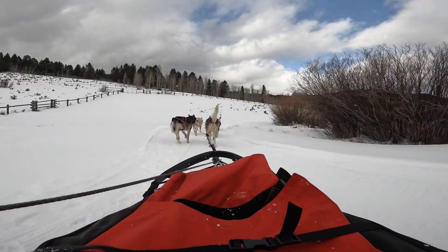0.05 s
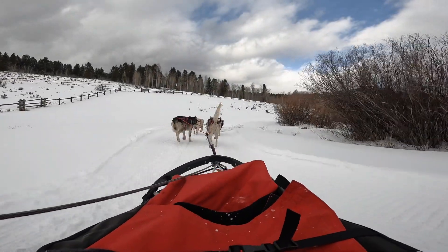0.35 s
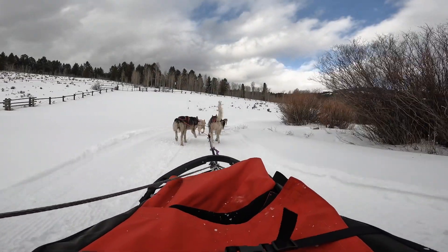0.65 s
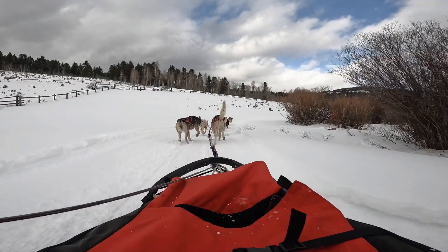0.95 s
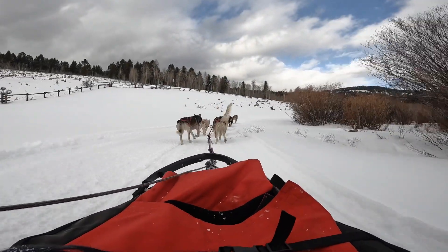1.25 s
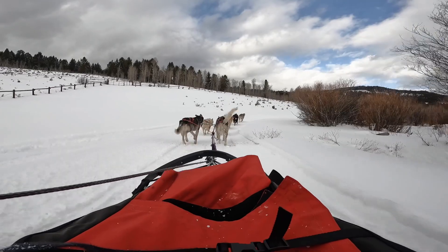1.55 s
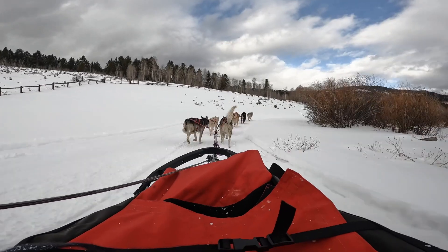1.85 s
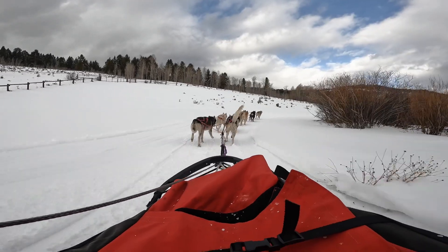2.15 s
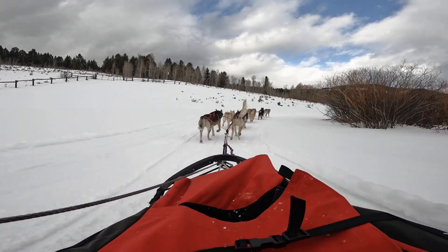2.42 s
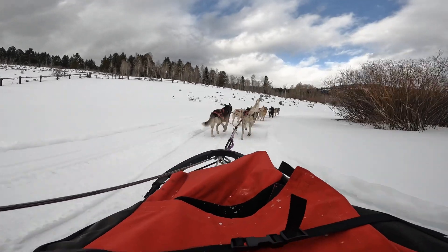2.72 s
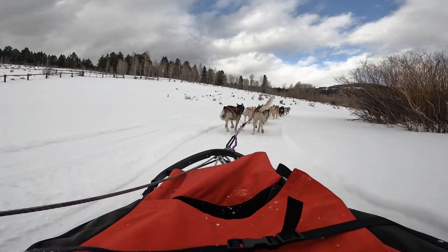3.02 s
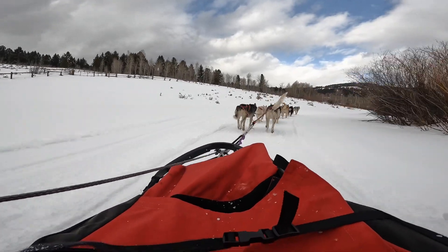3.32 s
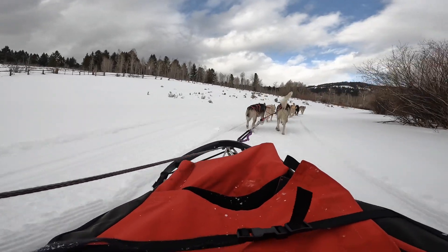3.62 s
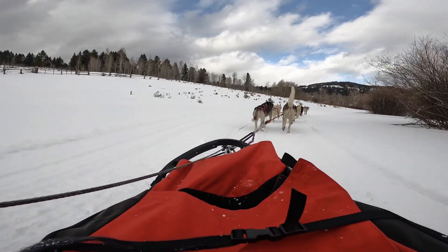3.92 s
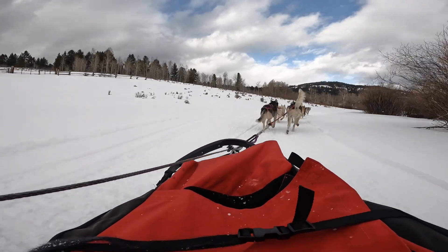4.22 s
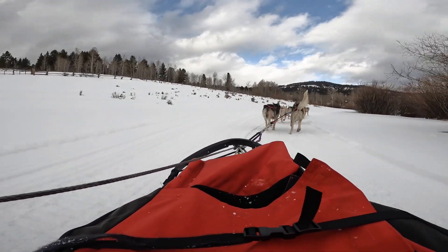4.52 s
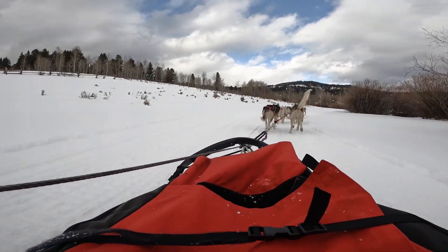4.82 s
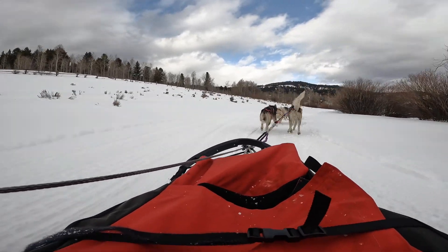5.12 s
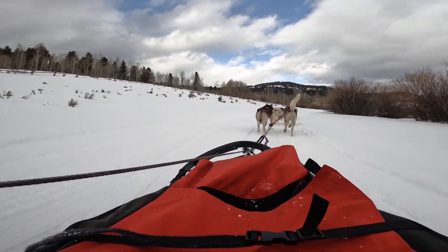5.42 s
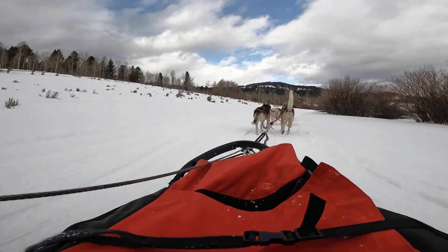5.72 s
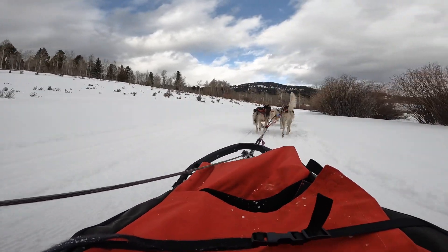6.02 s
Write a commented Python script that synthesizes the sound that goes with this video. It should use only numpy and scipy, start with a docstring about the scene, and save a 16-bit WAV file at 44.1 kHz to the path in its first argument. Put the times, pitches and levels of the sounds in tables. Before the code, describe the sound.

A dog sled glides over snow with a low, bumpy rumble, soft crunching, wind on the microphone and faint jingling metal.

```python
"""Dog sled on snow

A dog sled glides over a snowy field, heard from just behind its cargo bag. Lumps in the trail drum on
the frame, the runners crunch and hiss, and wind nudges the microphone. Ice crumbs tick and dry twigs
brush past; a small metal ring buzzes all along and a metal snap jingles near the end."""
import sys
import numpy as np
from scipy import signal
from scipy.fft import rfft, irfft, next_fast_len
from scipy.io import wavfile
from scipy.ndimage import uniform_filter1d, map_coordinates

SR = 44100
rng = np.random.default_rng(int(sys.argv[2]) if len(sys.argv) > 2 else 0)


def int16_out(signal):
    """Quantize to a 16-bit WAV file."""
    q = np.round(np.clip(np.atleast_2d(signal).T, -1, 1) * 32767)
    wavfile.write(sys.argv[1], SR, q.astype(np.int16))


N = 267246
TIME = np.arange(N) / SR


# Body of the rumble: (frequency [Hz], level [dB])
RUMBLE_SPECTRUM = [(60, -6), (100, -4), (140, 6.5), (200, -0.5), (250, -5), (310, -4), (390, -17.5),
                   (520, -20.5), (650, -36), (1200, -67.5)]
# Lumps hitting the frame: (time [s], level [dB])
KNOCKS = [(0.033, -31), (0.486, -28), (0.511, -48), (0.539, -23.5), (1.076, -35), (1.102, -33),
          (1.165, -37), (1.204, -30), (1.615, -34), (1.637, -31), (1.973, -25.5), (2.268, -45),
          (2.546, -42), (2.652, -28), (3.037, -28.5), (3.105, -23.5), (3.118, -25), (3.132, -24),
          (3.182, -34), (3.206, -25), (3.312, -23), (3.361, -28.5), (3.381, -23.5), (3.839, -29),
          (4.112, -46), (4.389, -39), (4.648, -47), (4.753, -29), (5.313, -30), (5.581, -42), (5.602, -27),
          (5.607, -25.5), (5.611, -17), (5.621, -29)]
# Frame resonances: (frequency [Hz], level [dB], t60 [s])
FRAME_MODES = [(135.5, 4.5, 0.07), (193, 6.5, 0.084), (284.4, 6, 0.07), (490, -13, 0.014),
               (850, -24, 0.027)]
def frame(low_gain, upper_gain):
    """Packed snow drums on the runners, brighter on hard crust; bigger lumps knock the frame."""
    drumming = coloured(grains(per_s=450, spread_db=0.5), RUMBLE_SPECTRUM)
    upper = signal.sosfiltfilt(signal.butter(4, 215, "high", fs=SR, output="sos"), drumming)
    soft = low_gain * evened(drumming - upper, window_s=0.082)
    hard = upper_gain * evened(upper, window_s=0.056)
    knocks = band(struck(KNOCKS, FRAME_MODES, uneven_db=0), low_hz=72, high_hz=880)
    return pan(soft, left_db=0.36) + pan(hard - from_db(-0.5) * knocks, left_db=-1.36)


# Midrange crunch and airy powder: (frequency [Hz], level [dB])
CRUNCH_SPECTRUM = [(350, -2.5), (600, 2.5), (900, 2), (1300, -3), (1800, -8.5), (2600, -18.5), (4500, -23),
                   (9000, -43.5)]
HISS_SPECTRUM = [(900, 4.5), (2000, 10), (3500, 9), (4400, 5), (5300, -2.5), (6400, 6), (7400, 6.5),
                 (8400, -1), (9400, 2.5), (10500, -9), (12500, -15), (14000, -19)]
def snow(crunch_gain, hiss_gain):
    """Crystals break under the runners in clumps and burst at each lump, while loose powder hisses."""
    breaking = grains(per_s=2500, spread_db=1) * from_db(1.76 * drift(70))
    sliding = grains(per_s=12000, spread_db=3) + from_db(-11) * grains(per_s=99, spread_db=11.5)
    load = crunch_gain + from_db(-38) * bursts(KNOCKS, rise_s=0.0024, decay_s=0.0058)
    crunch = load * evened(coloured(breaking, CRUNCH_SPECTRUM), window_s=0.33)
    swish = hiss_gain * from_db(-0.5 + 1.94 * drift(20))
    hiss = swish * coloured(sliding, HISS_SPECTRUM)
    return pan(crunch, left_db=-1) + pan(hiss, left_db=2)


# The bed of the glide: (time [s], rumble [dB], crunch [dB], hiss [dB])
GLIDE = [(0.0, -32.5, -60, -75.5), (0.2, -50.5, -71, -78.5), (0.43, -53, -71.5, -78),
         (0.62, -41.5, -65, -76.5), (0.9, -47.5, -69, -77), (1.3, -41.5, -63.5, -74),
         (1.7, -40.5, -62.5, -75.5), (1.92, -45, -65.5, -79), (2.18, -48, -66.5, -73.5),
         (2.55, -45, -66, -73.5), (3.3, -42.5, -64.5, -76.5), (3.5, -48.5, -67.5, -77),
         (3.8, -43.5, -64, -72.5), (4.4, -43, -65.5, -74), (4.8, -41, -61, -72), (5.3, -44.5, -65, -72),
         (5.62, -39.5, -55.5, -73.5), (6.06, -47.5, -62.5, -78.5)]
# Swells over bumps: (centre [s], length [s], low rumble [dB], upper rumble [dB], crunch [dB])
BUMPS = [(.039, 0.011, -37, -40.5, -82), (0.083, 0.02, -61, -42.5, -60.5), (0.253, 0.053, -54, -47, -63.5),
         (0.336, 0.1, -46.5, -50.5, -67.5), (0.511, 0.083, -36, -40, -61.5),
         (1.098, 0.071, -41, -43, -60.5), (1.187, 0.04, -36.5, -47.5, -72),
         (1.454, 0.076, -43, -43.5, -66.5), (1.649, 0.056, -34.5, -48, -62.5),
         (1.766, 0.068, -39.5, -54, -84), (2.01, 0.059, -48.5, -45.5, -61), (2.285, 0.077, -40.5, -74, -67),
         (2.408, 0.048, -44.5, -58, -73), (2.532, .075, -43, -48, -64.5), (2.675, 0.13, -40.5, -58, -85),
         (3.04, 0.062, -39.5, -48.5, -64.5), (3.122, 0.034, -37, -37.5, -54.5),
         (3.207, 0.071, -38, -39, -56), (3.309, 0.034, -40.5, -52, -61), (3.418, 0.09, -43, -46.5, -64.5),
         (3.6, 0.094, -41.5, -52, -63.5), (3.881, 0.053, -40, -49, -63), (4.67, .033, -58, -41, -56.5),
         (4.858, .042, -43, -50, -64), (5.55, 0.049, -44, -52, -57.5), (5.617, 0.082, -44, -42.5, -56.5),
         (5.73, .083, -39, -47, -69), (5.902, 0.13, -43.5, -45.5, -77), (6.04, 0.068, -46, -41, -61.5)]
def runner_loads():
    """The load swells over each bump; gives gains for low rumble, upper rumble, crunch and hiss."""
    rumble, crunch, hiss = gains(GLIDE)
    steady = np.array([from_db(-3) * rumble, from_db(-6) * rumble, crunch, hiss])
    low, upper, crushed = np.zeros((3, N))
    for centre, length, low_db, upper_db, crunch_db in BUMPS:
        shape = swell(centre, length)
        low += from_db(low_db) ** 2 * shape
        upper += from_db(upper_db) ** 2 * shape
        crushed += from_db(crunch_db) ** 2 * shape
    thrown_powder = from_db(-13) ** 2 * crushed
    return np.sqrt(steady ** 2 + [low, upper, crushed, thrown_powder])


# Low-end buffeting: (frequency [Hz], level [dB])
BUFFET_SPECTRUM = [(15, 10.5), (25, 8.5), (42, 4.5), (65, 2), (90, 1.5), (130, -28), (300, -62.5)]
# Gusts: (centre [s], length [s], level [dB], left minus right [dB])
GUSTS = [(0.097, 0.067, -46, 1), (0.565, 0.049, -43, -8), (1.13, 0.26, -41, -1), (1.726, .14, -49, 1),
         (2.062, 0.085, -43.5, -9), (2.272, .05, -47, -1), (2.468, .06, -41.5, -9), (2.634, .06, -41, -3),
         (2.79, .08, -44, -2), (2.952, .08, -50, -2), (3.186, 0.12, -38, .5), (3.36, 0.08, -50, -13),
         (3.946, 0.19, -44, -5), (4.177, 0.1, -39.5, -7.5), (4.622, 0.11, -41.5, -3),
         (4.925, 0.2, -41.5, -5), (5.61, 0.1, -48, -3)]
def wind():
    """Slow eddies push on the microphone: a wavering breeze, and gusts that lean to one side."""
    breeze = from_db(-48 + 2 * drift(9))
    power = pan(breeze, left_db=-1.6) ** 2
    for centre, length, db, left_db in GUSTS:
        power += pan(from_db(db), left_db) ** 2 * swell(centre, length)
    eddies = evened(coloured(rng.standard_normal(N), BUFFET_SPECTRUM), window_s=0.31)
    return np.sqrt(power) * eddies


# The snap ringing freely: (frequency [Hz], level [dB], t60 [s])
SNAP_MODES = [(8570, -20, .03), (9442, -24, .05), (10470, -22, .2), (10677, -8, .22), (10902, 2, .22),
              (10950, -3, .03), (11880, -19, .03), (13099, -10, .2), (13323, -19, .2)]
# Jerks on the line: (time [s], length [s], level [dB])
SNAP_JERKS = [(3.105, 0.02, -70), (3.545, 0.014, -69), (3.933, .03, -79), (4.155, 0.018, -73),
              (4.58, .05, -74), (4.695, 0.036, -81), (4.82, 0.064, -71.5), (4.885, .065, -63),
              (5.032, 0.15, -65.5), (5.2, 0.05, -67.5), (5.324, .05, -53.5), (5.385, 0.056, -70),
              (5.46, 0.15, -70.5), (5.66, 0.26, -77), (5.95, .055, -68)]
# Faint rattle between jerks: (time [s], level [dB])
SNAP_IDLE = [(0, -105), (3.0, -94), (4.5, -88), (6.06, -76)]
# Hard accents: (time [s], level [dB])
CLINKS = [(0.455, -63), (1.2092, -59.5), (1.2274, -56.5), (1.284, -62), (1.3169, -60), (1.3448, -69),
          (4.5146, -56.5), (4.5875, -51), (4.6114, -61), (4.6952, -56), (4.8838, -47.5), (4.8994, -61),
          (4.9214, -54), (4.9322, -46), (4.9484, -48), (5.0539, -53), (5.0799, -59), (5.1208, -50),
          (5.1417, -51), (5.1554, -43.5), (5.1744, -51), (5.3214, -54), (5.3268, -58), (5.3527, -45),
          (5.3574, -49), (5.3664, -52), (5.4146, -48.5), (5.4254, -53), (5.8561, -56), (5.9594, -54)]
def snap():
    """The metal snap rattles in bouts and clinks as the line jerks."""
    jerks = bouts(SNAP_JERKS, attack_s=0.0028, sag_db=0.5, release_s=0.0089)
    shake = np.hypot(gains(SNAP_IDLE)[0], jerks)
    # Most touches ring freely, over a quieter layer of short, choked clicks.
    choked_modes = [(hz, db, t60 * 0.073) for hz, db, t60 in SNAP_MODES]
    dull = rattle(choked_modes, per_s=350, spread_db=2.5, clump_db=5, clumps_per_s=45)
    free = rattle(SNAP_MODES, per_s=780, spread_db=4, clump_db=-3, clumps_per_s=40)
    rattling = shake * (from_db(-4) * dull + from_db(-2) * free)
    attack = struck(CLINKS, choked_modes, uneven_db=2)
    tail = struck(CLINKS, SNAP_MODES, uneven_db=2)
    return pan(rattling + attack + from_db(-10) * tail, left_db=0.5)


# The ring's thin partials: (frequency [Hz], level [dB], t60 [s])
RING_MODES = [(11520, 0, .03), (11660, -1, .024), (11830, -5, .02), (12340, -2, .028), (12470, 0, .032)]
# Jolts to the ring: (time [s], length [s], level [dB])
RING_JOLTS = [(0.294, .07, -78), (0.411, .05, -76), (0.597, 0.011, -72), (.642, 0.018, -85),
              (0.704, .02, -79), (0.75, 0.065, -76.5), (0.918, .19, -72.5), (1.153, 0.037, -77),
              (1.393, 0.092, -81), (1.497, 0.059, -75.5), (1.622, .04, -72.5), (1.7, 0.023, -76),
              (1.776, 0.034, -72), (2.02, .06, -76.5), (2.36, .03, -78), (2.72, 0.013, -72),
              (2.766, .035, -79), (2.861, .03, -75), (3.021, .07, -77), (3.14, 0.11, -68.5),
              (3.303, 0.023, -74), (3.54, 0.048, -71), (3.745, 0.052, -76), (3.914, 0.1, -78),
              (4.068, 0.026, -71), (4.158, .18, -72), (4.417, 0.065, -74), (4.57, 0.041, -75),
              (4.695, 0.045, -78), (5.115, 0.085, -71), (5.332, .06, -72), (5.497, 0.12, -69),
              (5.745, .035, -73), (5.993, 0.038, -75)]
# Shiver between jolts: (time [s], level [dB])
RING_IDLE = [(0, -92), (.9, -87), (3.0, -85), (4.5, -82.5), (6.06, -84)]
def small_ring():
    """A light ring shivers against its buckle; each jolt starts a thin, quickly damped chatter."""
    jolts = bouts(RING_JOLTS, attack_s=0.0015, sag_db=4.5, release_s=0.016)
    shake = np.hypot(gains(RING_IDLE)[0], jolts)
    chatter = shake * rattle(RING_MODES, per_s=690, spread_db=-1, clump_db=2.5, clumps_per_s=60)
    first_touch = struck([(s, db) for s, length, db in RING_JOLTS], RING_MODES, uneven_db=11)
    mid = from_db(0.5) * chatter + from_db(4) * first_touch
    scatter = rattle(RING_MODES, per_s=690, spread_db=2, clump_db=4.5, clumps_per_s=93)
    side = from_db(-9) * shake * scatter
    stereo = np.array([mid + side, mid - side])
    return pan(band(stereo, low_hz=10500, high_hz=13100), left_db=0.8)


# Crumbs and twigs hitting the sled: (time [s], level [dB], low [dB], middle [dB], high [dB])
TICKS = [(0.303, -50.5, -61.5, -63.5, -70), (0.507, -57.5, -64, -61, -76), (1.355, -56, -56, -66, -75),
         (2.1415, -59, -64, -75, -73), (2.187, -53.5, -60, -72, -71), (2.361, -39.5, -47, -60, -51),
         (2.4113, -51.5, -57, -82, -60), (2.4374, -56, -58, -72, -72), (3.1182, -53, -51, -49, -65),
         (3.1507, -42, -47, -60, -51), (3.154, -51, -70, -51, -56), (3.164, -41.5, -53.5, -67, -51.5),
         (3.168, -48, -56, -65, -64), (3.211, -52, -51, -59, -66), (3.556, -45, -53, -70, -60),
         (3.8776, -56, -62, -77, -69), (4.6506, -51.5, -57, -70, -65), (5.053, -52, -73, -74, -52),
         (5.549, -48, -51, -70, -70), (5.8522, -56, -56, -80, -74)]
# A tick's low, middle and high bands: (lower edge [Hz], upper edge [Hz])
TICK_BANDS = [(1000, 2400), (2900, 4000), (5800, 8200)]
def ice_ticks(decay_s=0.0018, width=0.97):
    """Each crumb or twig gives one sharp pulse and a brief splintering, dull or bright."""
    out, t = np.zeros((2, N)), TIME[:SR // 30]
    for s, db, *bands_db in TICKS:
        splinters = rng.standard_normal(len(t)) + width * rng.standard_normal((2, len(t)))
        burst = (t == 0) + from_db(-20) * splinters * np.exp(-t / decay_s)
        crack = sum(from_db(band_db) * rms_one(band(burst, *edges))
                    for band_db, edges in zip(bands_db, TICK_BANDS))
        add(out, s, from_db(db + 2.5) * crack / np.abs(crack).max())
    return out


# Metal rubs: (centre [s], length [s], pitch [Hz], level [dB])
SQUEAKS = [(0.456, 0.013, 8700, -69), (2.11, .04, 9150, -88), (3.917, 0.016, 9300, -78),
           (4.934, 0.022, 8600, -68), (5.462, 0.037, 8840, -69), (5.524, 0.032, 9000, -60.5)]
def squeaks():
    """Metal sticks and slips on metal in short, thin chirps."""
    out = np.zeros(N)
    for centre, length, hz, db in SQUEAKS:
        slips = grains(per_s=560, spread_db=-8.5)
        rub = evened(resonate(slips, hz, t60=0.014), window_s=0.026)
        out += from_db(db) * rub * np.exp(-2 * ((TIME - centre) / length) ** 2)
    return out


# One pass through dry twigs: (time [s], level [dB])
TWIG_BRUSH = [(0, -120), (2.1, -112), (2.2, -76), (2.3, -70.5), (2.42, -71), (2.48, -90), (2.6, -120)]
def twigs():
    """Dry stalks scrape along the sled with a broad crackle."""
    centre, left, right = [grains(per_s=2000, spread_db=3) for _ in range(3)]
    crackle = centre + 0.6 * np.array([left, right])
    return gains(TWIG_BRUSH)[0] * rms_one(band(crackle, low_hz=1550, high_hz=6700))


# Stereo image, tight in the bass and wider on top: (frequency [Hz], left-right correlation [0-1])
STEREO_CORRELATION = [(25, 0.91), (60, 1), (130, 1), (260, 1), (500, 0.93), (1000, 0.88), (2000, 0.61),
                      (4000, 0.61), (7500, 0.63), (13000, 0.73)]
def coloured(source, spectrum):
    """Shape a source to a spectrum and widen it with diffuse noise; rms 1."""
    size = 2 * next_fast_len(N // 2 + SR // 4)
    hz = np.maximum(np.arange(size // 2 + 1) * SR / size, 1)
    magnitude = from_db(at_hz(spectrum, hz)) * hz / np.hypot(hz, 10)
    # Minimum phase keeps the attacks free of pre-ring.
    cepstrum = irfft(np.log(magnitude))
    colour = np.exp(rfft(2 * cepstrum[:size // 2], size) - cepstrum[0])
    correlation = np.clip(at_hz(STEREO_CORRELATION, hz), 0, 0.999)
    mid = irfft(rfft(source, size) * colour * np.sqrt(1 + correlation))[:N]
    side = irfft(rfft(rng.standard_normal(N), size) * colour * np.sqrt(1 - correlation))[:N]
    return rms_one(np.array([mid + side, mid - side]))


def grains(per_s, spread_db):
    """Random tiny impacts of uneven size; rms 1."""
    sizes = from_db(spread_db * np.minimum(rng.exponential(1, N), 4)) * rng.choice([-1, 1], N)
    return rms_one(sizes * (rng.random(N) < per_s / SR))


def struck(rows, modes, uneven_db):
    """Every blow rings every mode, its strength scattered by uneven_db."""
    s, blow_db = np.transpose(rows)
    strength = from_db(blow_db[:, None] + uneven_db * rng.standard_normal((len(s), len(modes))))
    out = np.zeros(N)
    for k, (hz, db, t60) in enumerate(modes):
        clicks = np.zeros(N)
        clicks[(s * SR).astype(int)] = strength[:, k]
        out += from_db(db) * resonate(clicks, hz, t60)
    return out / sum(from_db(db) for hz, db, t60 in modes)


def rattle(modes, per_s, spread_db, clump_db, clumps_per_s):
    """Loose metal touches many times a second, in clumps; slow level 1."""
    touches = grains(per_s, spread_db) * from_db(clump_db * drift(clumps_per_s))
    ringing = sum(from_db(db) * resonate(touches * rng.standard_normal(N), hz, t60)
                  for hz, db, t60 in modes)
    return evened(ringing, window_s=0.074)


def resonate(clicks, hz, t60):
    """A unit click starts a decaying sine of height 1."""
    radius, angle = from_db(-60 / (t60 * SR)), 2 * np.pi * hz / SR
    return signal.lfilter([np.sin(angle)], [1, -2 * radius * np.cos(angle), radius ** 2], clicks + 1e-18)


def bouts(rows, attack_s, sag_db, release_s):
    """Rattle envelope: each bout starts abruptly, sags over its length and dies away."""
    out, t = np.zeros(N), TIME[:SR // 2]
    for s, length, db in rows:
        attack = 1 - np.exp(-t / attack_s)
        held = from_db(db + sag_db * (0.5 - np.minimum(t / length, 1)))
        release = np.exp(-np.maximum(t - length, 0) / release_s)
        add(out, s, attack * held * release)
    return out


def bursts(rows, rise_s, decay_s):
    """An envelope that jumps at each hit and dies away."""
    out, t = np.zeros(N), TIME[:SR // 3]
    for s, db in rows:
        add(out, s, from_db(db) * (1 - np.exp(-t / rise_s)) * np.exp(-t / decay_s))
    return out


def swell(centre, length):
    """A bell-shaped rise and fall of power."""
    return np.exp(-np.minimum(4 * ((TIME - centre) / length) ** 2, 60))


def drift(per_s):
    """A random wander with rms 1, turning about per_s times a second."""
    knots = rng.standard_normal(8192)
    return rms_one(map_coordinates(knots, [TIME * per_s], order=1, mode="wrap"))


def evened(x, window_s):
    """Hold the slow level at 1 and keep the fast grain."""
    power = uniform_filter1d(np.mean(np.atleast_2d(x) ** 2, axis=0), max(int(window_s * SR), 2))
    return x / np.sqrt(np.maximum(power, 0) + 1e-3 * power.mean())


def gains(rows):
    """Each dB column of a curve as a gain per sample."""
    s, *columns = np.transpose(rows)
    return [from_db(np.interp(TIME, s, db)) for db in columns]


def at_hz(points, hz):
    """Read a spectrum on a log-frequency axis."""
    knots_hz, values = np.transpose(points)
    return np.interp(np.log(hz), np.log(knots_hz), values)


def band(x, low_hz, high_hz):
    """Band-pass with gentle slopes."""
    return signal.sosfilt(signal.butter(2, [low_hz, high_hz], "band", fs=SR, output="sos"), x + 1e-18)


def pan(x, left_db):
    """Place a sound between the two channels."""
    return x * from_db([[left_db / 2], [-left_db / 2]])


def add(out, s, sound):
    """Mix a short sound in at time s."""
    start = max(round(s * SR), 0)
    out[..., start:start + sound.shape[-1]] += sound[..., :N - start]


def from_db(db):
    """Decibels to gain."""
    return 10 ** (np.asarray(db) / 20)


def rms_one(x):
    """Scale to an rms of 1."""
    return x / np.sqrt(np.mean(x ** 2) + 1e-20)


def scene():
    """Open snow gives no echo: everything arrives dry."""
    low, upper, crunch, hiss = runner_loads()
    sled = frame(low, upper) + snow(crunch, hiss) + twigs() + ice_ticks()
    return sled + small_ring() + snap() + squeaks() + wind()


def record(dry):
    """A steep high cut takes off the very top."""
    cutoff_hz = 13550
    return signal.sosfilt(signal.ellip(10, 0.1, 80, cutoff_hz, fs=SR, output="sos"), dry)


dry = scene()
out = record(dry)
int16_out(out)
```